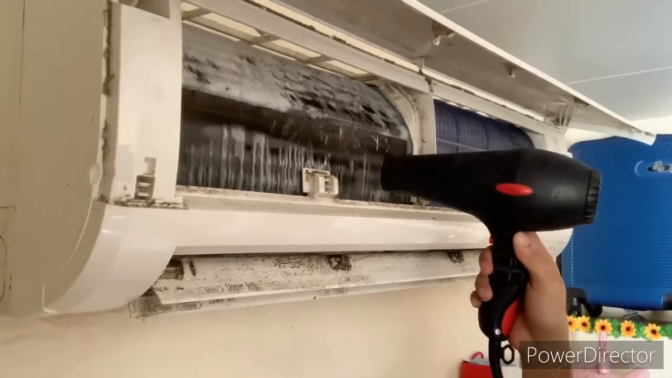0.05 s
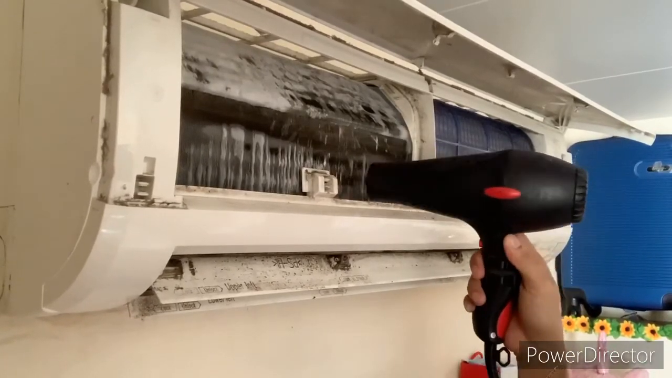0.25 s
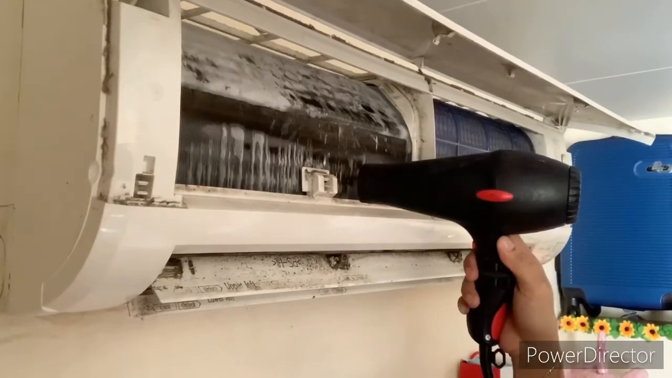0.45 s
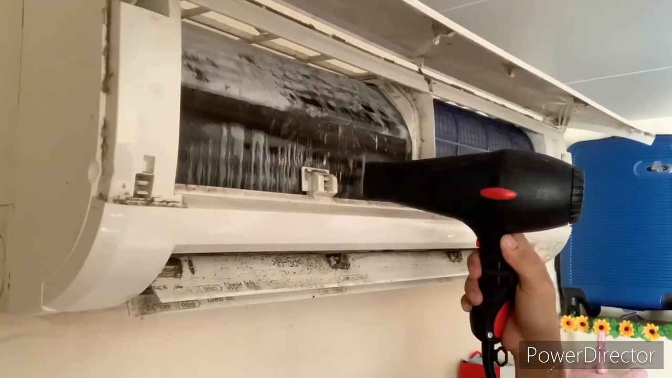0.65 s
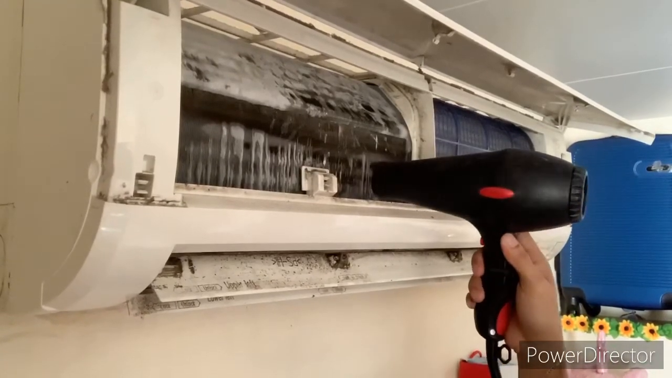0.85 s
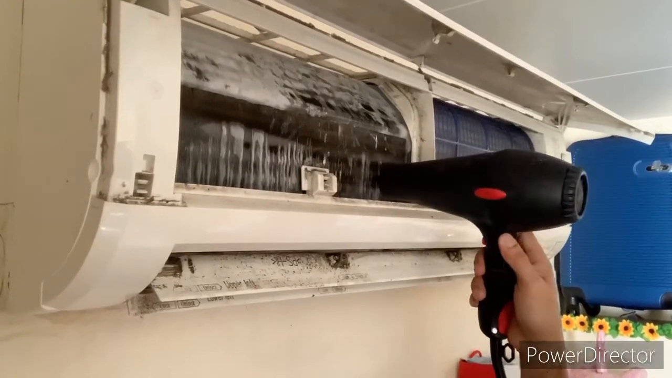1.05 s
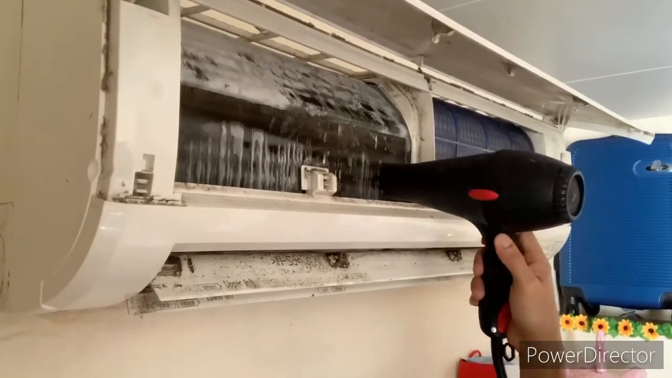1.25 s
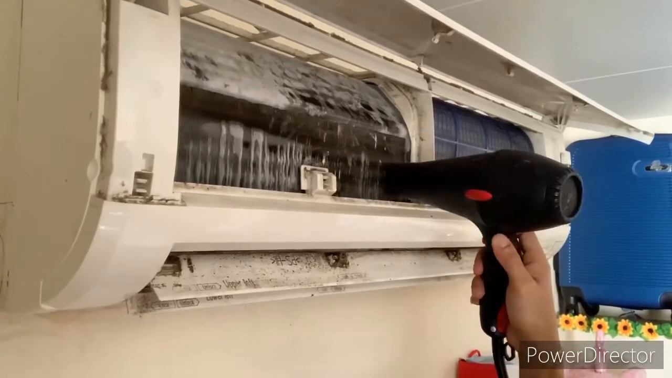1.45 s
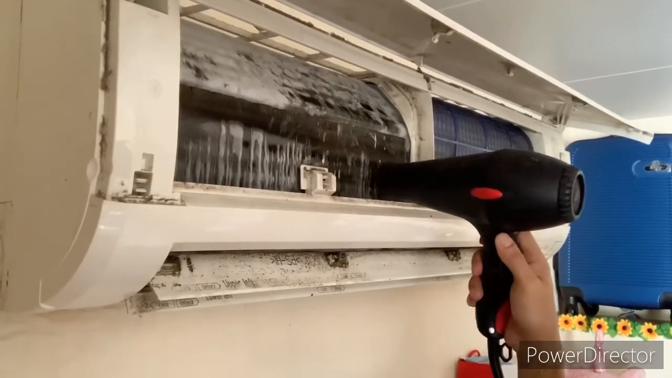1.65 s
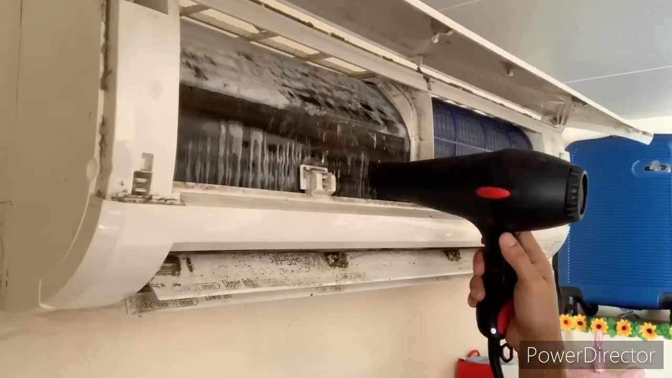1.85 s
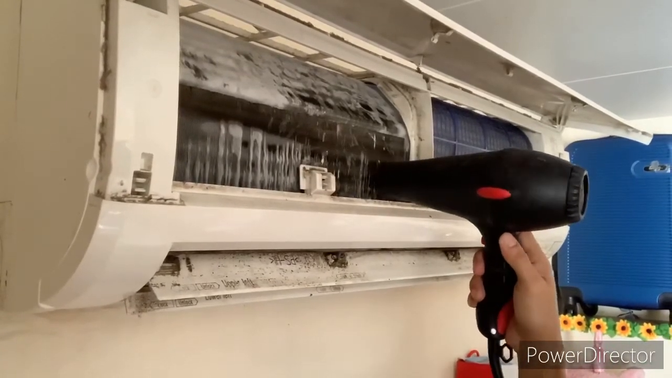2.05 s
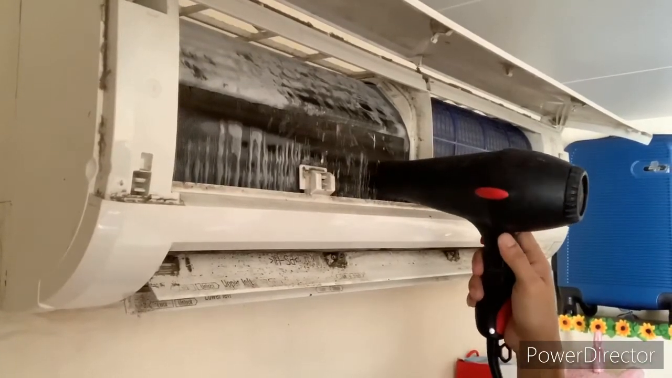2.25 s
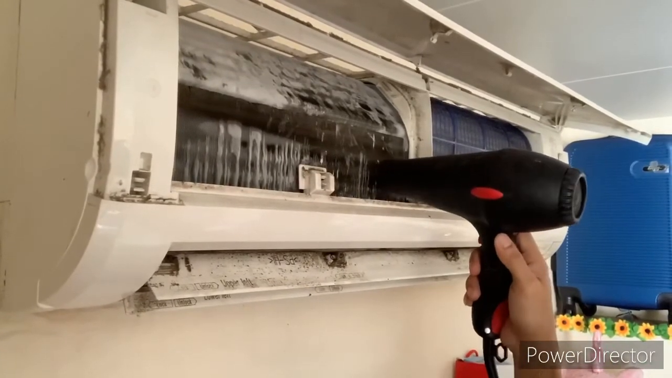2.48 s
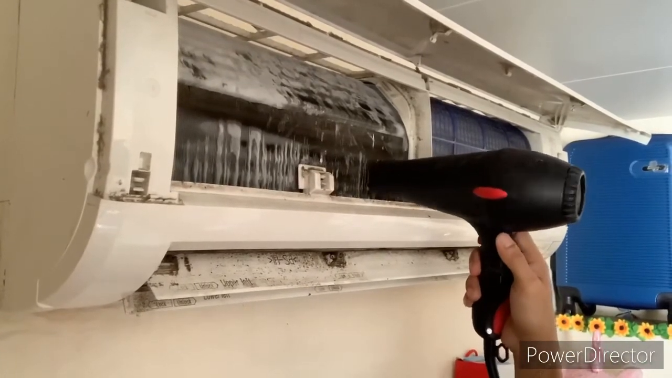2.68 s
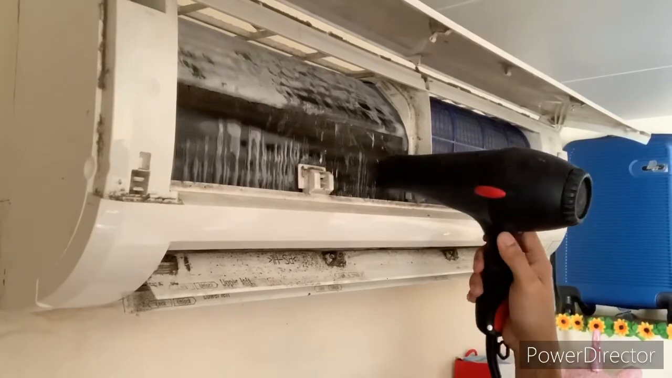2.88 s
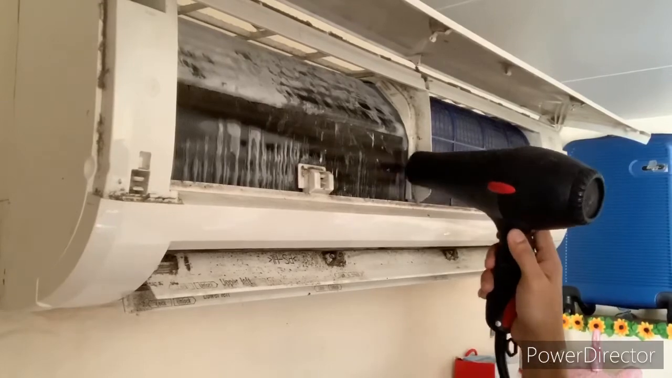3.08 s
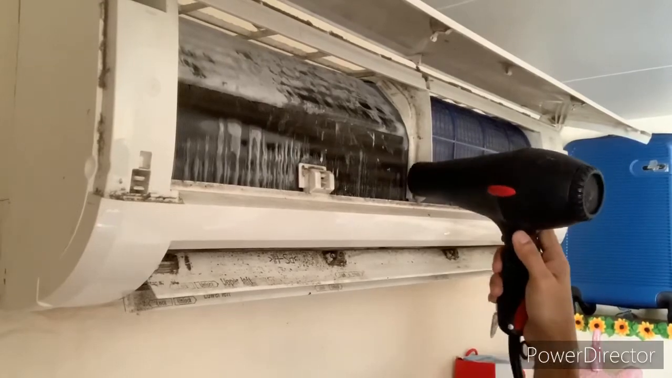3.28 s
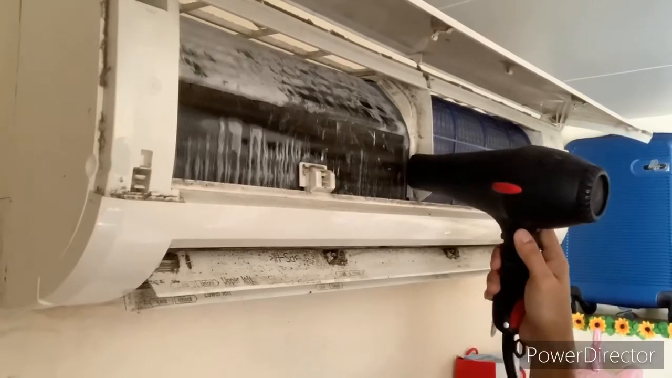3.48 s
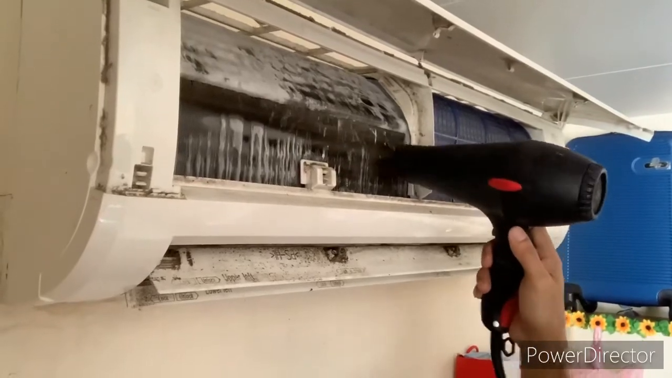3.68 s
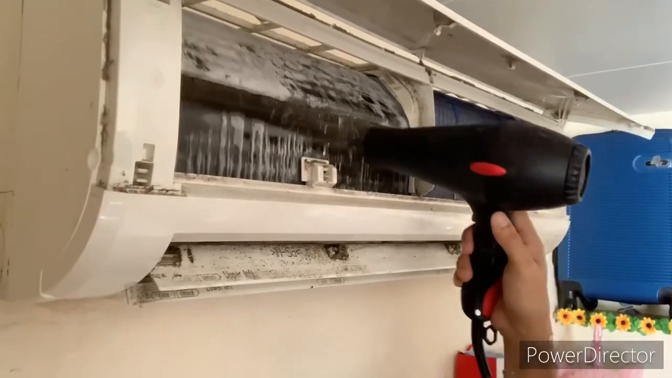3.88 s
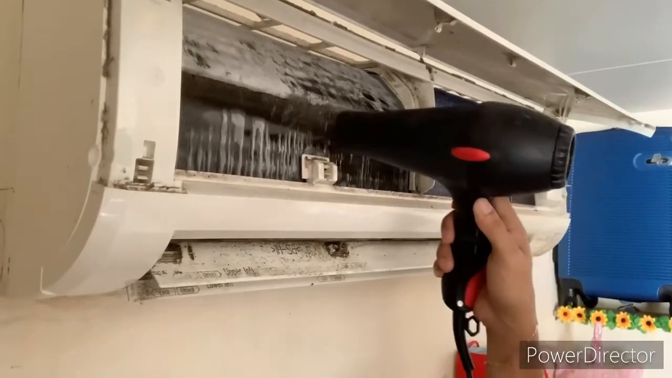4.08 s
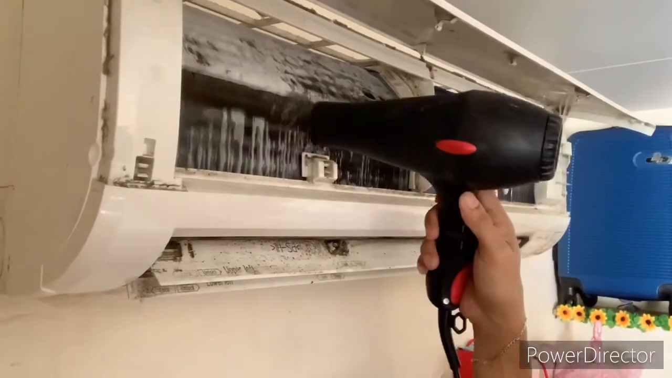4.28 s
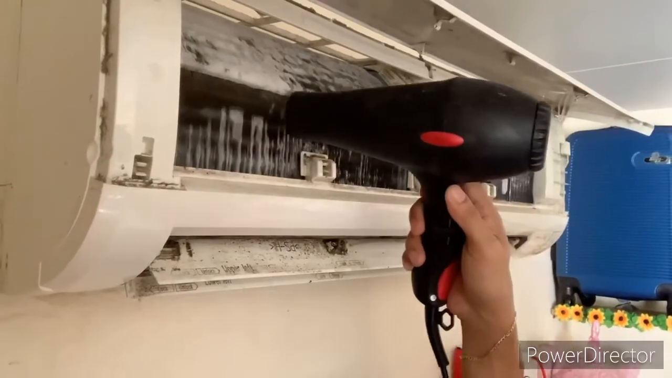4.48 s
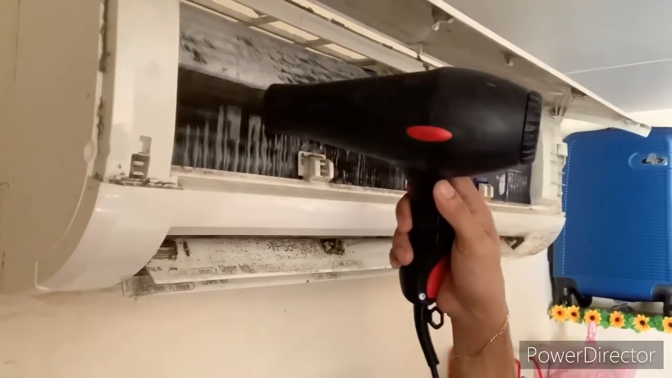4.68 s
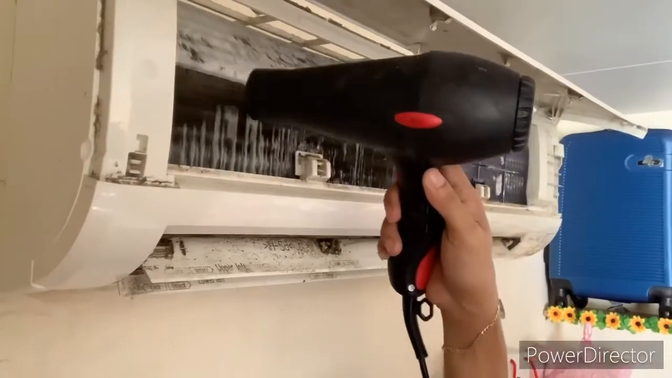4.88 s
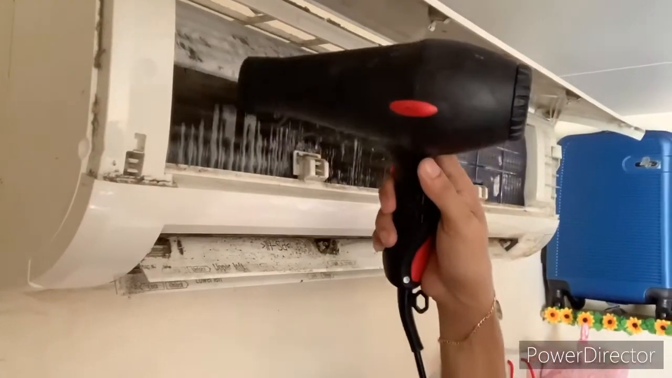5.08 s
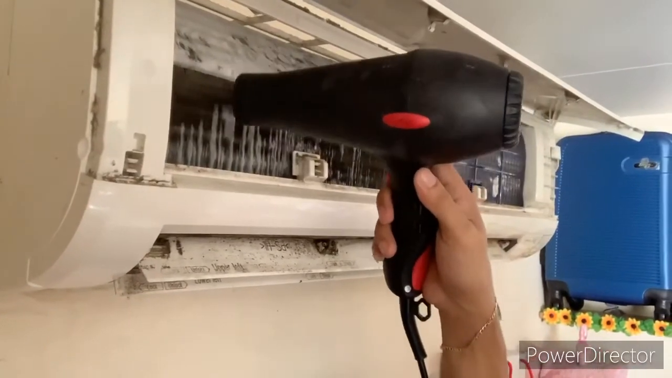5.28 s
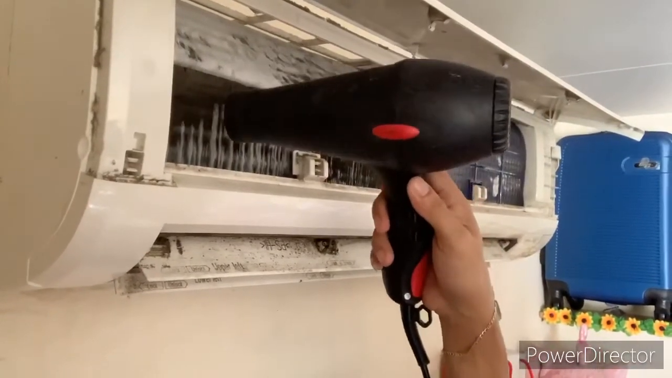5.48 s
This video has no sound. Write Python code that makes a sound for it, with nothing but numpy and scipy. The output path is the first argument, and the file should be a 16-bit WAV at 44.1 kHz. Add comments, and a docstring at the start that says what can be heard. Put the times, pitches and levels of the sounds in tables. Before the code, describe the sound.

A handheld hair dryer runs from the first moment to the end, about five and a half seconds, blowing into the open casing of a wall air conditioner indoors. It is heard close up in wide stereo: a slightly hollow roar of air, a bright hiss where the jet meets the fins, a thin high whine that fades and returns, and a low hum underneath. Around 1.8 to 2.2 seconds a distant bird gives three faint, quick peeps, a little to the right. The roar swells slightly around 3 seconds, and one short, bright tick sounds at about 3.4 seconds. From roughly 3.6 to 5 seconds the dryer swings towards the microphones, and the roar becomes fuller and somewhat louder, with the whine more noticeable. It is still blowing at the end.

```python
"""A handheld hair dryer roars into the open casing of a wall air conditioner, heard by two microphones
a hand apart. Its turbulent air excites resonances of barrel and casing, the jet hisses on the fins,
and blades passing the struts whine thinly over a low hum. Near the end the dryer swings towards the
microphones and the roar grows fuller. Before that a distant bird peeps three times and one tick sounds."""
import sys
import numpy as np
from scipy import signal
from scipy.io import wavfile
from scipy.ndimage import uniform_filter1d

SR = 44100
rng = np.random.default_rng(int(sys.argv[2]) if len(sys.argv) > 2 else 0)


def transcribe(u):
    """Save the signal u as a 16-bit wav file named by the first command-line argument.

    u: samples, shape (n,) or (channels, n), limited to [-1, 1]; the rate is SR.
    q: integer samples, one column per channel.
    """
    v = np.clip(np.atleast_2d(u).T, -1, 1)
    q = np.round(v * 32767).astype(np.int16)
    wavfile.write(sys.argv[1], SR, q)


N = 244312

# Base spectral density of the low roar and mid rush; far is at the casing, near is at the microphones:
# frequency_hz, far_left_db, far_right_db, near_left_db, near_right_db
ROAR_SPECTRUM = [(45, -73.5, -69.5, -72.0, -68.0), (70, -67.0, -63.5, -65.0, -61.0),
                 (90, -64.0, -59.5, -63.0, -60.0), (180, -72.5, -69.5, -65.5, -61.5),
                 (240, -68.0, -61.5, -61.5, -56.5), (340, -65.0, -61.0, -63.0, -51.5),
                 (410, -74.0, -59.0, -55.0, -49.5), (500, -58.5, -53.5, -54.0, -47.0),
                 (580, -61.5, -60.5, -50.5, -52.5), (690, -57.0, -64.5, -53.0, -58.0),
                 (860, -51.0, -57.0, -47.0, -54.5), (1030, -55.0, -57.0, -51.0, -52.5),
                 (1220, -52.0, -52.0, -49.5, -47.5), (1400, -57.5, -54.5, -58.5, -55.5)]
RUSH_SPECTRUM = [(1600, -67.0, -65.0, -67.0, -67.5), (1800, -63.5, -63.5, -63.0, -63.5),
                 (2000, -63.5, -62.5, -61.5, -60.5), (2300, -68.5, -68.5, -65.0, -65.0),
                 (2600, -66.5, -66.0, -65.0, -65.5), (2900, -64.5, -66.5, -66.0, -67.0),
                 (3200, -66.5, -67.5, -68.5, -67.5), (3520, -67.0, -68.5, -68.0, -68.5),
                 (3650, -73.0, -72.5, -67.0, -68.0), (4200, -72.5, -71.5, -71.5, -71.5),
                 (4800, -73.5, -71.5, -72.5, -71.0), (5400, -75.0, -74.0, -76.0, -75.0),
                 (6200, -72.5, -71.0, -71.5, -69.0)]
# Base spectral density of the jet on the fins: frequency_hz, level_db
HISS_SPECTRUM = [(7000, -70.5), (8000, -70), (9300, -70), (10500, -71), (11500, -73), (13500, -74),
                 (14300, -75), (15200, -78), (15600, -80)]
# Stereo image of roar and rush, as left-right likeness (0-1) and phase lead of the right side:
# frequency_hz, far_likeness, far_lead_rad, near_likeness, near_lead_rad
ROAR_IMAGE = [(170, 0.91, 0.5, 0.91, 0.2), (240, 0.99, 0.2, 0.97, 0.0), (340, 0.93, 0.8, 0.62, 0.0),
              (410, 0.6, 0.7, 0.78, -1.1), (480, 0.48, -1.6, 0.88, -1.3), (550, 0.9, -1.5, 0.8, -0.7),
              (680, 0.68, -1.5, 0.65, -1.1), (860, 0.81, 0.9, 0.56, 0.6), (1000, 0.74, 1.2, 0.56, 0.8),
              (1240, 0.89, 1.2, 0.75, 0.8), (1420, 0.76, 1.4, 0.56, 0.7)]
RUSH_IMAGE = [(1600, 0.65, 1.1, 0.25, -0.8), (1780, 0.41, 1.8, 0.39, 2.3), (2000, 0.38, 1.7, 0.31, 2.7),
              (2300, 0.57, -0.1, 0.53, -0.5), (2600, 0.27, -1.5, 0.43, -1.4), (2900, 0.36, -2.7, 0.38, 3.1),
              (3200, 0.2, 2.9, 0.23, 1.6), (3500, 0.4, 0.3, 0.26, 1.2), (3750, 0.25, 0.7, 0.32, -1.1),
              (4200, 0.37, -0.7, 0.14, -0.6), (4800, 0.2, 0.8, 0.23, 0.4), (5500, 0.34, 2.7, 0.15, 1.9),
              (6200, 0.49, 1.9, 0.49, 0.4)]
# Stereo image of the hiss, left and right nearly opposite around 8.5 kHz:
# frequency_hz, likeness, lead_rad
HISS_IMAGE = [(7000, .5, 2.5), (7600, .92, 3), (8100, .998, 3.14), (9100, .998, 3.14), (9700, .85, -2.5),
              (10400, .65, -1.7), (11000, .65, -.8), (11700, .998, 0), (13600, .998, 0), (14000, .6, .8),
              (14500, .45, 1.8), (15200, .9, 3.1)]
# Resonances and hollows of barrel and casing with the dryer far, half turned and near:
# centre_hz, width_hz, left_db, right_db
FAR_RESONANCES = [(120, 30, -2.0, -3.0), (145, 20, 3.5, 2.5), (253, 36, 6.5, 6.5), (305, 35, -5.5, -3.5),
                  (360, 30, 5.0, 1.0), (400, 24, -5.0, -2.5), (452, 18, 0.0, -8.5), (478, 22, -5.5, 8.5),
                  (503, 15, -1.0, -10), (531, 30, 4.0, 8.0), (578, 28, -3.0, -6.0), (635, 30, 1.0, 3.5),
                  (738, 24, -4.5, 2.0), (778, 25, -4.0, -6.5), (960, 30, -0.5, -5.5), (1253, 60, 8.0, 5.5),
                  (1775, 60, -6.0, -7.0), (2660, 50, -5.5, -5.0), (3290, 110, 2.0, 2.0)]
TURNING_RESONANCES = [(152, 14, 7, 8), (537, 35, -11, -5), (637, 37, 5.5, 8), (1190, 50, -1, 5),
                      (6280, 350, 0, 4)]
NEAR_RESONANCES = [(120, 16, -9, -6), (204, 33, -4, -3.5), (465, 15, -10, -5.5), (1283, 20, -14, -19),
                   (4420, 120, -3, 2.5)]
# Throb of the barrel's main resonance: centre_hz, width_hz, depth_db
BARREL_THROB = (1250, 300, 0.88)
# Swell of the low roar as the nozzle draws back from the fins: start_s, length_s, gain_db
DRAW_BACK_SWELL = (2.8, 1, 2.2)
# Treble gains above HISS_EDGE_HZ and SIZZLE_EDGE_HZ: time_s, hiss_db, sizzle_db
TREBLE_GAINS = [(0, -3.5, 2), (.4, -1.5, -3), (.9, 0.5, -1), (2.5, -0.5, 0.5), (2.9, -2.5, 2),
                (3.25, -1, -3.5), (3.46, -2, 1), (3.59, -1.5, 1), (3.635, 2, 2), (3.71, 0.5, -1),
                (4.15, -1, 1), (4.5, -0.5, 3), (4.85, -2, -2), (5.25, 3, -7), (5.54, .5, 0)]
# Blade whine, swelling as the dryer turns: time_s, fundamental_db, octave_db
WHINE_LEVELS = [(0, -50, -66), (.8, -45, -62), (1.5, -74, -64), (2.5, -71, -72), (3.3, -51, -62),
                (3.9, -51, -67), (4.3, -56, -44.5), (4.7, -47, -82), (5.2, -45, -52), (5.54, -49, -49)]
# Fundamental of the low hum: time_s, level_db
HUM_LEVELS = [(0, -53), (.7, -48), (2, -56), (2.5, -42), (3.1, -48), (3.9, -55), (4.6, -48), (5.54, -49)]
# Bird whistles: start_s, level_db, start_pitch_hz, end_pitch_hz, length_s
BIRD_PEEPS = [(1.81, -35.5, 2110, 2130, 0.061), (1.99, -37, 2120, 2140, 0.065),
              (2.163, -39.5, 2080, 2090, 0.054)]
# Bright tick: start_s, level_db, t60_s
TICK_EVENTS = [(3.44, -24, .06)]

SWING, LOW_SWING = (3.62, 1.4), (4.4, 0.35)  # above and below ROAR_SPLIT_HZ: start_s, length_s
ROAR_SPLIT_HZ, HISS_EDGE_HZ, SIZZLE_EDGE_HZ = 573, 5550, 10500
DRUM_FROM_HZ, DRUM_TO_HZ = 250, 427
OVERSHOOT_DB, SETTLED_DB, SETTLE_S = 4.5, -3.5, 0.42
WHINE_HZ, HUM_HZ = 2214.3, 47.9
BASS_CUT_HZ, TREBLE_CUT_HZ = 41, 15640


def dryer_air():
    """Source and filter: broadband turbulent noise is coloured by barrel and casing."""
    hz, t, spectra = signal.stft(rng.standard_normal((4, N)), SR, nperseg=4096, noverlap=3072)
    left, independent, gain_noise, phase_noise = spectra
    upper = above(hz, ROAR_SPLIT_HZ, 23)
    nearness = upper * swing(t, *SWING) + (1 - upper) * swing(t, *LOW_SWING)
    db = casing_colour_db(hz, t, nearness) + low_roar_db(hz, t, upper) + fin_hiss_db(hz, t)
    db += turbulence_db(hz, gain_noise.real)
    db += barrel_throb_db(hz, t) + wall_ripple_db(hz, gain_noise.imag)
    likeness = stereo_image(hz, nearness, phase_noise.real)
    right = likeness * left + np.sqrt(np.clip(1 - abs(likeness) ** 2, 0, 1)) * independent
    coloured = np.array([left, right]) * gain_of(db) * np.sqrt(SR / 2)
    return signal.istft(coloured, SR, nperseg=4096, noverlap=3072)[1][:, :N]


def casing_colour_db(hz, t, nearness):
    """Resonance of barrel and casing shapes a spectrum that slides as the dryer swings near."""
    rows = ROAR_SPECTRUM + RUSH_SPECTRUM + [(f, *[db] * 4) for f, db in HISS_SPECTRUM]
    base_db = interpolate(rows, hz, np.log1p)[..., None]
    far_db = base_db[:2] + resonances_db(FAR_RESONANCES, hz)
    near_db = base_db[2:] + resonances_db(NEAR_RESONANCES, hz)
    turning_db = resonances_db(TURNING_RESONANCES, hz) * np.sin(np.pi * swing(t, *SWING))
    return far_db + nearness * (near_db - far_db) + turning_db


def low_roar_db(hz, t, upper):
    """Jet impingement: the roar swells as the nozzle draws back, then drums on the cover and settles."""
    start_s, length_s, depth_db = DRAW_BACK_SWELL
    swell_db = depth_db * np.sin(np.pi * np.clip((t - start_s) / length_s, 0, 1))
    settling = np.exp(-np.maximum(t - sum(LOW_SWING), 0) / SETTLE_S)
    drum_db = swing(t, *LOW_SWING) * (SETTLED_DB + (OVERSHOOT_DB - SETTLED_DB) * settling)
    drum_band = above(hz, DRUM_FROM_HZ, 20) * (1 - above(hz, DRUM_TO_HZ, 7.5))
    return drum_db * drum_band + swell_db * above(hz, DRUM_FROM_HZ, 21) * (1 - upper)


def fin_hiss_db(hz, t):
    """Flow noise of the jet on the fins rises and falls in two treble shelves."""
    hiss_db, sizzle_db = interpolate(TREBLE_GAINS, t)
    return hiss_db * above(hz, HISS_EDGE_HZ, 2.3) + sizzle_db * above(hz, SIZZLE_EDGE_HZ, 36)


def turbulence_db(hz, noise):
    """Random modulation: eddies swell, the rush whirs, the hiss flutters as the jet wanders on the fins."""
    eddies = 0.25 * above(hz, 890, 3.7) * smooth_field(noise, bins=40, frames=3)
    rush_band = above(hz, 1620, 10.5) * (1 - above(hz, 8200, 0.54))
    whir = 2.7 * rush_band * smooth_field(rng.standard_normal(noise.shape), bins=9, frames=7)
    wander = smooth_field(rng.standard_normal(noise.shape), bins=500, frames=4)
    return eddies + whir + 0.97 * above(hz, 2400, 3.6) * wander


def barrel_throb_db(hz, t):
    """Amplitude modulation of the barrel's main resonance is heard as an irregular throb."""
    centre_hz, width_hz, depth_db = BARREL_THROB
    peak_db = resonances_db([(centre_hz, width_hz, depth_db, depth_db)], hz)
    return peak_db * unit_rms(rng.standard_normal(len(t)))


def wall_ripple_db(hz, noise):
    """Interference of wall reflections ripples the spectrum and drifts with the hand."""
    depth_db = 1.5 * above(hz, 300, 2) + 1.3 * above(hz, 1600, 8)
    return depth_db * smooth_field(noise, bins=4, frames=30)


def stereo_image(hz, nearness, noise):
    """Left-right likeness and phase set the stereo width; reflections scatter the phase of the rush."""
    rows = ROAR_IMAGE + RUSH_IMAGE + [row + row[1:] for row in HISS_IMAGE]
    row_hz, far_likeness, far_lead, near_likeness, near_lead = np.transpose(rows)
    far = np.interp(hz, row_hz, far_likeness * np.exp(1j * far_lead))[:, None]
    near = np.interp(hz, row_hz, near_likeness * np.exp(1j * near_lead))[:, None]
    likeness = far + nearness * (near - far)
    scatter_rad = 1.1 * above(hz, 1700, 10) * (1 - above(hz, 5500, 12))
    phase = scatter_rad * smooth_field(noise, bins=12, frames=90)
    likeness *= np.exp(scatter_rad ** 2 / 2 + 1j * phase)  # narrow bands are more alike than the mean
    return likeness / np.maximum(abs(likeness), 1)


def blade_whine(t):
    """Blade-passing tone: blades crossing the struts make periodic pressure pulses."""
    return tone(WHINE_HZ, *interpolate(WHINE_LEVELS, t), waver_hz=2.43, balance_db=0.1, lead_rad=0.1)


def low_hum(t):
    """Two harmonics make a low hum; the fundamental swells and sinks under a steady octave."""
    level_db, = interpolate(HUM_LEVELS, t)
    return tone(HUM_HZ, level_db, octave_db=-57, waver_hz=0.43, balance_db=1.0, lead_rad=0.054)


def tick():
    """A bright transient with exponential decay, as of ice or plastic shifting in the heat."""
    out, t = np.zeros(N), np.arange(4000) / SR
    for start_s, level_db, t60_s in TICK_EVENTS:
        bright_noise = unit_rms(np.diff(rng.standard_normal(len(t)), n=2, prepend=[0, 0]))
        out[round(start_s * SR):][:len(t)] += gain_of(level_db - 60 * t / t60_s) * bright_noise
    return np.array([out, np.roll(out, shift=-7)])  # reaches the right microphone first


def bird():
    """Nearly pure tones glide upward; a level difference places the bird to the right."""
    out = np.zeros(N)
    for start_s, level_db, start_hz, end_hz, length_s in BIRD_PEEPS:
        progress = np.arange(0, length_s, 1 / SR) / length_s
        hz = start_hz + (end_hz - start_hz) * progress ** 2
        envelope = gain_of(level_db) * np.sqrt(2) * np.sin(np.pi * progress)
        out[round(start_s * SR):][:len(hz)] += envelope * np.sin(2 * np.pi * np.cumsum(hz) / SR)
    return out * gain_of([[-3.5], [3.0]])


def tone(hz, level_db, octave_db, waver_hz, balance_db, lead_rad):
    """Slow frequency modulation of a tone and its octave; balance and lead favour the right side."""
    hz = hz + waver_hz * unit_rms(uniform_filter1d(rng.standard_normal(N), size=4000))
    phase = 2 * np.pi * np.cumsum(hz) / SR + np.array([[0], [lead_rad]])
    harmonics = gain_of(level_db) * np.sin(phase) + gain_of(octave_db) * np.sin(2 * phase)
    return np.sqrt(2) * harmonics * gain_of([[-balance_db / 2], [balance_db / 2]])


def resonances_db(rows, hz):
    """Lorentzian peaks and dips, left and right."""
    return sum(np.array(gains_db)[:, None, None] / (1 + (2 * (hz[:, None] - centre_hz) / width_hz) ** 2)
               for centre_hz, width_hz, *gains_db in rows)


def smooth_field(noise, bins, frames):
    """Moving averages correlate noise over frequency and time."""
    return unit_rms(uniform_filter1d(uniform_filter1d(noise, size=bins, axis=0), size=frames, axis=1))


def swing(t, start_s, length_s):
    """Raised-cosine rise from 0 to 1."""
    return np.sin(np.pi / 2 * np.clip((t - start_s) / length_s, 0, 1)) ** 2


def above(hz, edge_hz, steepness):
    """High-pass weighting from 0 to 1."""
    return 1 / (1 + (edge_hz / (hz[:, None] + 1)) ** steepness)


def interpolate(rows, at, warp=lambda v: v):
    """Linear interpolation of a table along its first column, optionally warped."""
    axis, *columns = np.transpose(rows)
    return np.array([np.interp(warp(at), warp(axis), column) for column in columns])


def gain_of(db):
    """Decibels to an amplitude ratio."""
    return 10 ** (np.asarray(db) / 20)


def unit_rms(x):
    """Normalisation to rms 1."""
    return x / np.sqrt(np.mean(x ** 2) + 1e-20)


def scene():
    """Superposition of all sources at the two microphones."""
    t = np.arange(N) / SR
    return dryer_air() + blade_whine(t) + low_hum(t) + tick() + bird()


def record(dry):
    """Band limiting: the microphones drop the deepest bass, and a low-pass cuts the highest treble."""
    dry = signal.sosfilt(signal.butter(8, BASS_CUT_HZ, "high", fs=SR, output="sos"), dry)
    low_pass = signal.firwin(511, TREBLE_CUT_HZ, window=("kaiser", 9), fs=SR)
    return signal.oaconvolve(dry, low_pass[None], "same")


dry = scene()
out = record(dry)
transcribe(out)
```